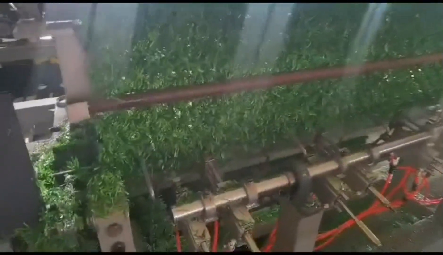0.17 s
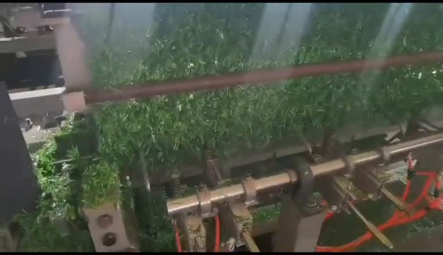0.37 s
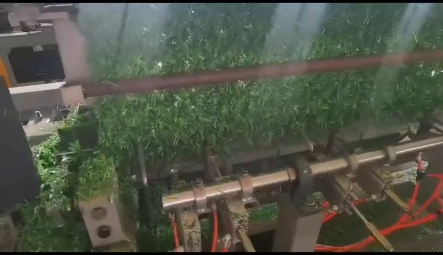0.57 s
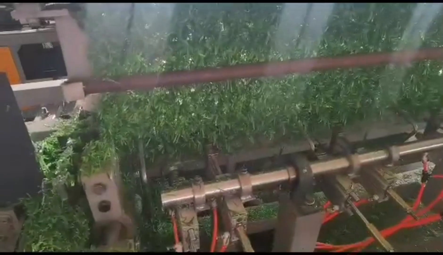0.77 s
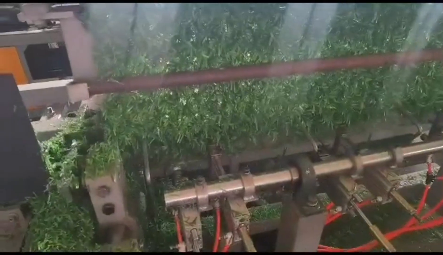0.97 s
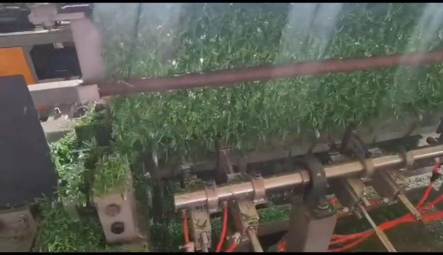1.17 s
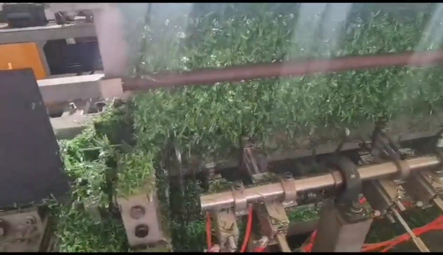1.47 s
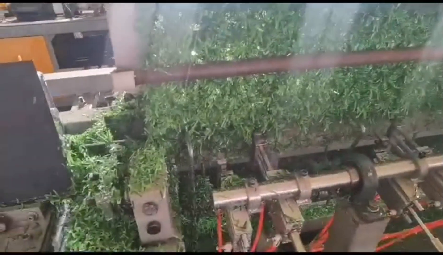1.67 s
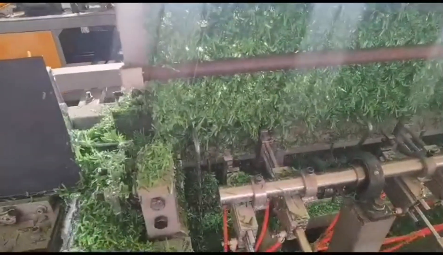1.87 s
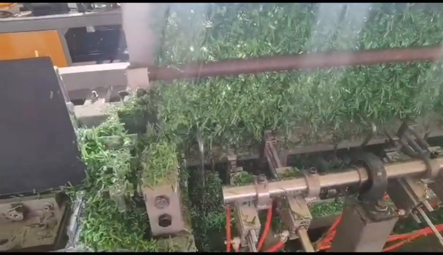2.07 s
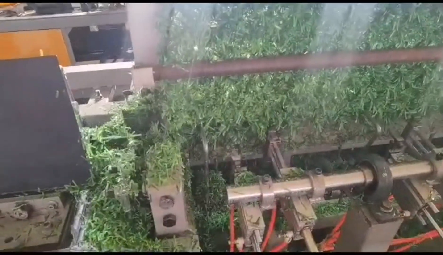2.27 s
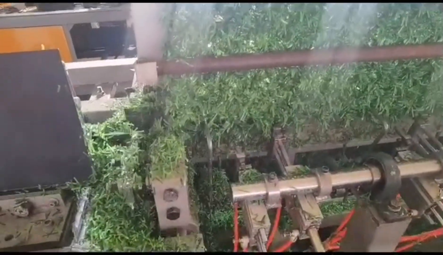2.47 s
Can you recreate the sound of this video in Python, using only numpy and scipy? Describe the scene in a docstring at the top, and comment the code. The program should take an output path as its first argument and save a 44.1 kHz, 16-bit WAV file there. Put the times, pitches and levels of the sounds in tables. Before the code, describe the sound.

An industrial machine cycles with metal knocks and pneumatic hisses over a steady hum.

```python
"""A machine twisting green plastic bristles into wire mesh runs one cycle in a factory hall.
Air valves hiss, a servo gear whines up and down, latches clink, levers clunk, the steel frame knocks
and judders. The drive rumbles, rests and restarts; bristles and wire rustle through the guides.
Underneath: a leaking air line, an electric hum and a thin motor whine."""
import sys
import numpy as np
from scipy import signal
from scipy.fft import rfft, irfft, next_fast_len
from scipy.io import wavfile
from scipy.ndimage import map_coordinates

SR = 44100
rng = np.random.default_rng(int(sys.argv[2]) if len(sys.argv) > 2 else 0)


def master_out(mix):
    """Clip the mix to full scale and print it as 16-bit PCM to the path in sys.argv[1]."""
    frames = np.transpose(np.atleast_2d(mix))
    ceiling = np.clip(frames, -1, 1)
    pcm = np.round(ceiling * 32767).astype(np.int16)
    wavfile.write(sys.argv[1], SR, pcm)


N = 115101

# left-right likeness of the sound field: (frequency [Hz], correlation [-1..1])
COHERENCE = [(290, 0.98), (1200, 0.96), (3000, -0.15)]


def amp(db):
    return 10 ** (np.asarray(db) / 20)


def clock():
    return np.arange(N) / SR


def along(points, hz):
    """Interpolate (frequency [Hz], value) points on a log axis."""
    f, v = np.transpose(points)
    return np.interp(np.log(hz + 1), np.log(f + 1), v)


def level(rows):
    """Gain per sample from (time [s], level [dB]) rows."""
    return amp(np.interp(clock(), *np.transpose(rows)))


def wobble(rate_hz):
    """Smooth random curve, knots at rate_hz."""
    return map_coordinates(rng.standard_normal(int(N * rate_hz / SR) + 4), [clock() * rate_hz])


def filtered(x, response):
    """Apply a frequency response by FFT."""
    m = next_fast_len(N + SR // 2)
    return irfft(rfft(x, m) * response(np.fft.rfftfreq(m, 1 / SR)), m)[..., :N]


def spread_rad(hz):
    """Mid-side angle that gives the field's coherence."""
    return np.arccos(np.clip(along(COHERENCE, hz), -1, 1)) / 2


def rush(spectrum, grain_db=0):
    """Stereo noise, rms 1, rippled by close resonances of metal and hall; grain_db clumps it."""
    pair = rng.standard_normal((2, N)) * amp(grain_db * wobble(900))
    knots_hz = np.arange(0, SR / 2, 22)
    ripple_db = 3 * rng.standard_normal(len(knots_hz)) * knots_hz / (knots_hz + 700)
    gain = lambda hz: amp(along(spectrum, hz) + np.interp(hz, knots_hz, ripple_db))
    mid, side = filtered(pair, lambda hz: gain(hz) * [np.cos(spread_rad(hz)), np.sin(spread_rad(hz))])
    stereo = np.array([mid + side, mid - side])
    return stereo / np.sqrt(np.mean(stereo ** 2) + 1e-20)


def burst(start_s, rise_s, hold_s, t60_s, db):
    """Envelope: rise, hold, exponential decay."""
    t = clock() - start_s
    return np.sqrt(np.clip(t / rise_s, 0, 1)) * amp(db - 60 * np.maximum(t - rise_s - hold_s, 0) / t60_s)


def room(x):
    """Diffuse hall reverb of a mono signal."""
    tail = rush([(1, 0)]) * burst(0.0022, 0.0068, 0, t60_s=0.49, db=0)
    return signal.fftconvolve(x[None], tail / np.linalg.norm(tail[0]), axes=1)[:, :N]


def tone(hz, drift_rad, waver_db):
    """Unsteady sine; high tones reach the two microphones out of phase."""
    phase = 2 * np.pi * hz * clock() + drift_rad * wobble(9)
    pair = [np.sin(phase + side * spread_rad(hz)) * amp(waver_db * wobble(14)) for side in (1, -1)]
    return np.sqrt(2) * np.array(pair)


def idle():
    """Hall noise, air leak, electric hum and a swelling motor whine."""
    # hall noise and air leak: (frequency [Hz], relative density [dB])
    hall_spectrum = [(60, -10), (160, -3), (210, -3.5), (240, -1.5), (500, -17), (950, -5.5), (1400, -11.5),
                     (2000, -4), (2700, -9), (3300, -7.5), (3700, -10.5), (4300, -4.5), (5200, -8),
                     (6400, 2.5), (7900, -6.5), (8600, 0), (10500, -13)]
    # hum lines: (frequency [Hz], level [dB])
    hum_lines = [(241, -48.5), (990, -49.5), (2110, -47), (2250, -48), (3241, -52.5), (6535, -53)]
    # motor whine: (time [s], level [dB])
    whine_levels = [(.92, -40.5), (1.0, -36), (1.07, -44), (1.52, -42), (1.59, -37.5), (1.7, -38.5),
                    (1.77, -50), (1.83, -39.5), (1.93, -44), (1.995, -34.5), (2.07, -47), (2.36, -37),
                    (2.61, -42)]
    hum = sum(amp(db) * tone(hz, drift_rad=1.1, waver_db=2.2) for hz, db in hum_lines)
    hall = amp(-29.5) * rush(hall_spectrum, grain_db=1)
    whine = level(whine_levels) * tone(hz=1056.6, drift_rad=0.091, waver_db=3.1)
    return hall + hum + whine


def drive():
    """The shaft rumbles unevenly and pulls rustling bristles and wire through the guides."""
    # shaft and feed envelopes: (time [s], level [dB])
    shaft_levels = [(.27, -36), (.31, -29), (.68, -31), (.78, -27), (.95, -29), (1.06, -39), (1.28, -36),
                    (1.45, -46), (2.14, -58), (2.158, -31), (2.24, -29), (2.27, -35), (2.48, -30),
                    (2.61, -32)]
    feed_levels = [(0, -25.5), (.45, -26.5), (.92, -26), (1.2, -32.5), (1.45, -33.5), (2.12, -40),
                   (2.15, -30.5), (2.61, -36)]
    # shaft and feed spectra: (frequency [Hz], relative density [dB])
    shaft_spectrum = [(80, -7.5), (170, 1), (220, 2.5), (275, -2), (390, -6.5), (520, -17), (1000, -12),
                      (2200, -11.5), (8000, -66)]
    feed_spectrum = [(400, -9), (800, -7), (1600, -6), (2200, 3.5), (2800, -16.5), (3250, 1), (3800, -10.5),
                     (6400, 2.5), (10500, -11)]
    rumble = level(shaft_levels) * amp(wobble(35.04)) * rush(shaft_spectrum)
    rustle = level(feed_levels) * rush(feed_spectrum, grain_db=1)
    return rumble + rustle


def air_valves():
    """A cylinder fills with a narrow hiss, then vents with a broad puff and a duller afterblow."""
    # intake, exhaust, afterblow: (start [s], rise [s], hold [s], t60 [s], level [dB])
    jets = [(0.107, 0.04, 0.12, 1, -17), (1.019, 0.033, 0.037, 0.64, -18.5),
            (1.118, 0.036, 0.035, 0.78, -22.5)]
    # jet spectra: (frequency [Hz], relative density [dB])
    intake = [(150, -55), (290, -8.5), (550, -20), (2300, -14.5), (3800, -16.5), (4800, -10.5),
              (5700, -2.5), (6400, -6), (7400, -18.5), (10500, -23)]
    exhaust = [(250, -15.5), (1600, -0.5), (3600, -3.5), (5800, 5), (8800, -4.5), (10500, -12.5)]
    afterblow = [(600, -10), (2300, 0), (6000, -3.5), (9000, -13.5)]
    return sum(burst(*jet) * rush(spectrum, grain_db=1.5)
               for jet, spectrum in zip(jets, [intake, exhaust, afterblow]))


def housing(hz):
    """Response of the gearbox housing: two resonances."""
    modes_hz, width_hz = [1346, 1656], 45
    damping = 1j * hz * width_hz
    return 1 + amp(1.5) * sum(damping / (mode ** 2 - hz ** 2 + damping) for mode in modes_hz)


def servo():
    """Gear pitch and level follow each move's speed; the gearbox rattles under load, its housing rings."""
    # servo moves: (start [s], run-up [s], run-down [s], top gear pitch [Hz], relative level [dB])
    moves = [(.3, .125, .08, 1755, -31), (2.165, .125, .09, 1591, -30.5)]
    # gearbox rattles: (start [s], rise [s], hold [s], t60 [s], level [dB])
    rattles = [(0.294, 0.024, 0.016, 0.45, -24), (0.378, 0.0087, 0.016, 0.98, -29),
               (0.688, 0.036, 0.021, 0.087, -24.5), (2.139, 0.011, 0.055, 0.25, -35.5),
               (2.247, 0.0066, 0.025, 1, -27.5)]
    # rattle spectrum: (frequency [Hz], relative density [dB])
    rattle_spectrum = [(150, -47), (420, -0.5), (1150, -3), (1420, -0.5), (1950, -2.5), (8000, -23)]
    t, gear = clock(), np.zeros(N)
    for start_s, up_s, down_s, top_hz, db in moves:
        ramp = np.interp(t, [start_s, start_s + up_s, start_s + up_s + down_s], [0, 1, 0])
        speed = np.sin(np.pi / 2 * ramp) ** 2
        pitch_hz = top_hz * speed * (1 + 0.019 * wobble(150))
        phase = 2 * np.pi * np.cumsum(pitch_hz) / SR
        gear += amp(db) * speed ** 0.85 * (np.sin(phase) + amp(-4.5) * np.sin(phase / 2))
    rattle = sum(burst(*row) for row in rattles) * rush(rattle_spectrum, grain_db=2.5)
    return filtered(amp(1.5) * gear + room(gear) + rattle, housing)


def struck(blows, t60_s, crack_db, crack_t60_s=0.055):
    """Each blow cracks and rings a steel part in the hall; higher parts crack brighter."""
    # steel part modes: (frequency / ring pitch [ratio], level [dB])
    modes = [(.58, -6), (1, 0), (1.47, -4)]
    t, hits = np.arange(SR // 8) / SR, np.zeros(N)
    for time_s, hz, db in blows:
        ring = sum(amp(mode_db - 60 * t / t60_s) * np.sin(2 * np.pi * hz * ratio * t)
                   for ratio, mode_db in modes)
        bright = signal.lfilter(*signal.butter(1, hz / 2, "high", fs=SR), rng.standard_normal(len(t)))
        crack = amp(crack_db - 60 * t / crack_t60_s) * bright
        hits[round(time_s * SR):][:len(t)] += amp(db) * (ring + crack)
    return hits + amp(-6) * room(hits)


def linkage():
    """Latches and valves clink; heavy levers clunk as they take up the load."""
    # latch and lever blows: (time [s], ring pitch [Hz], level [dB])
    clinks = [(.394, 5580, -16), (.691, 4700, -17.5), (1.026, 6100, -22.5), (1.046, 7400, -15.5),
              (1.066, 8600, -17), (1.076, 3700, -17.5), (2.254, 7700, -20), (2.259, 5050, -20.5)]
    clunks = [(.294, 380, -19.5), (.32, 520, -22), (.604, 560, -25), (2.15, 360, -26), (2.221, 600, -23),
              (2.458, 620, -27)]
    return struck(clinks, t60_s=0.04, crack_db=3.5) + struck(clunks, t60_s=0.08, crack_db=-12)


def frame():
    """Knocks and a fast end-of-stroke judder ring the steel frame; the machine bed booms after."""
    # frame modes: (frequency [Hz], level [dB], t60 [s])
    modes = [(82, -15, .25), (108, -12, .14), (137, -14, .25), (168, -10, .12), (218, 1, .1),
             (243, -9, .16), (345, -6, .07), (385, -11, .1), (452, -13, .14)]
    # blows on the frame: (time [s], level [dB])
    knocks = [(.318, -20), (.372, -22), (.447, -23), (.602, -21), (.776, -23), (.843, -25), (2.194, -24),
              (2.234, -25)]
    # bed boom: (start [s], rise [s], hold [s], t60 [s], level [dB])
    boom = [(.705, 0.015, 0.026, 0.96, -28)]
    # bed spectrum: (frequency [Hz], relative density [dB])
    bed_spectrum = [(45, -12), (75, 0), (135, -14), (400, -46)]
    judder_start_s, judder_length_s, judder_hz, judder_db, fade_db = 0.69, 0.078, 115.1, -15.5, 16.5
    contact_s = 0.0015
    t = np.arange(SR // 2) / SR
    ring = sum((-1) ** k * amp(db - 60 * t / t60_s) * np.sin(2 * np.pi * hz * t)
               for k, (hz, db, t60_s) in enumerate(modes))
    slips_s = np.arange(0, judder_length_s, 1 / judder_hz)
    judder = [(judder_start_s + s, judder_db - fade_db * s / judder_length_s) for s in slips_s]
    blows = np.zeros(N)
    for time_s, db in knocks + judder:
        blows[round((time_s + rng.normal(0, 0.0003)) * SR)] += amp(db + rng.normal(0, 1))
    body = signal.fftconvolve(blows, ring * (1 - np.exp(-t / contact_s)))[:N]
    return body + amp(-8) * room(body) + burst(*boom[0]) * rush(bed_spectrum)


def scene():
    """Machine slightly to the left: that channel leads, and is louder in the mids."""
    # channel balance: (frequency [Hz], left over right [dB])
    balance = [(60, -2.2), (600, 3), (5000, -.5), (14000, 1.5)]
    left_lead_s, sides = 0.0002242, np.array([[0.5], [-0.5]])
    machine = idle() + drive() + air_valves() + servo() + frame() + linkage()
    pan = lambda hz: amp(sides * along(balance, hz)) * np.exp(2j * np.pi * hz * sides * left_lead_s)
    return filtered(machine, pan)


def record(dry):
    """Small microphone: weak deep bass and top, hard band limit."""
    # microphone response: (frequency [Hz], gain [dB])
    response = [(50, -19), (75, 2), (10000, 2.5), (11800, -11), (15500, -20)]
    limit_hz = 15800
    return filtered(dry, lambda hz: amp(along(response, hz)) * (hz < limit_hz))


dry = scene()
out = record(dry)
master_out(out)
```